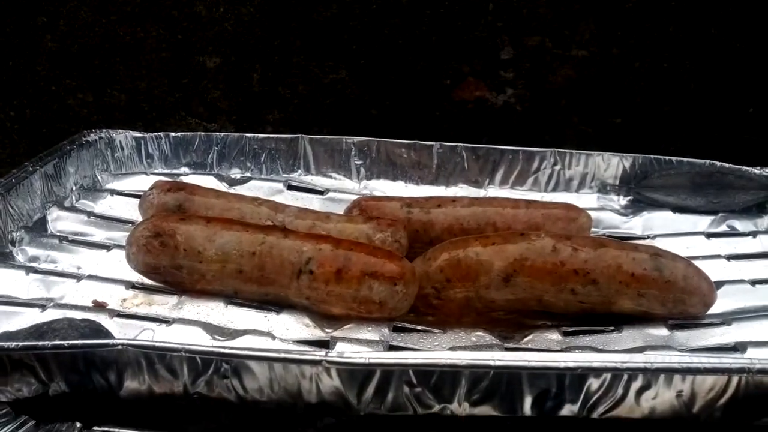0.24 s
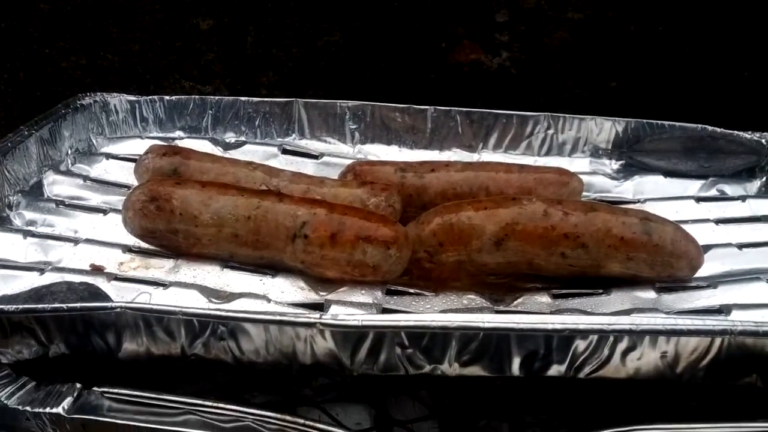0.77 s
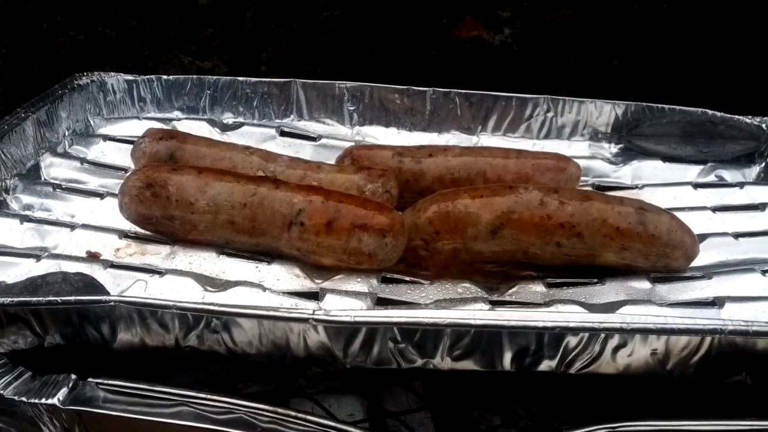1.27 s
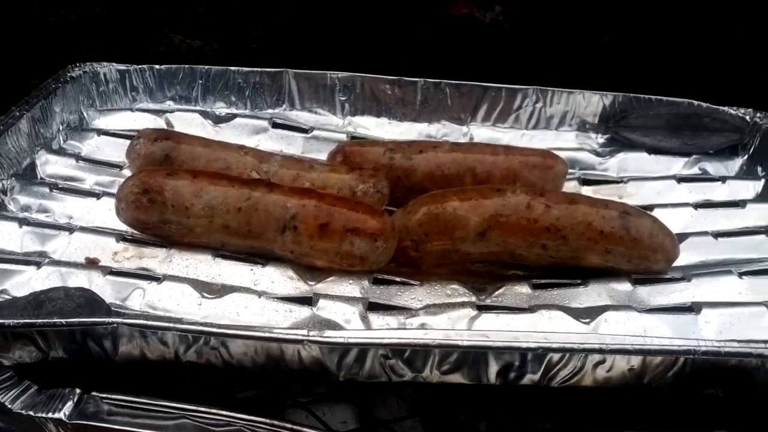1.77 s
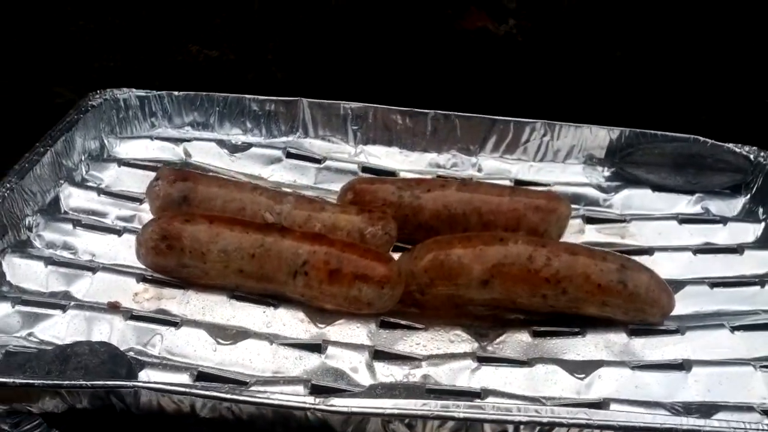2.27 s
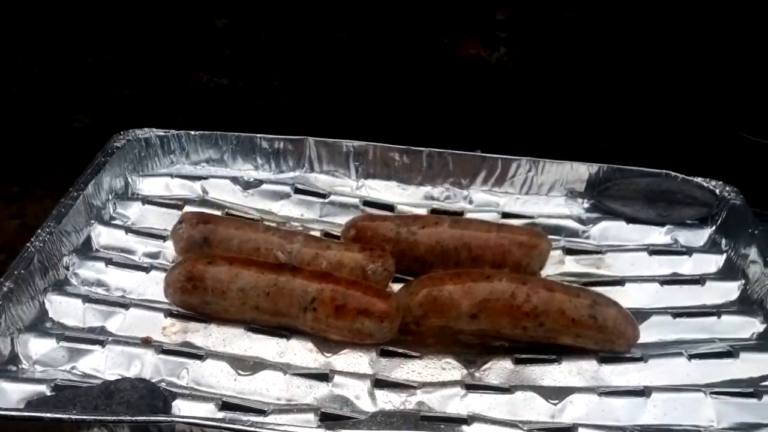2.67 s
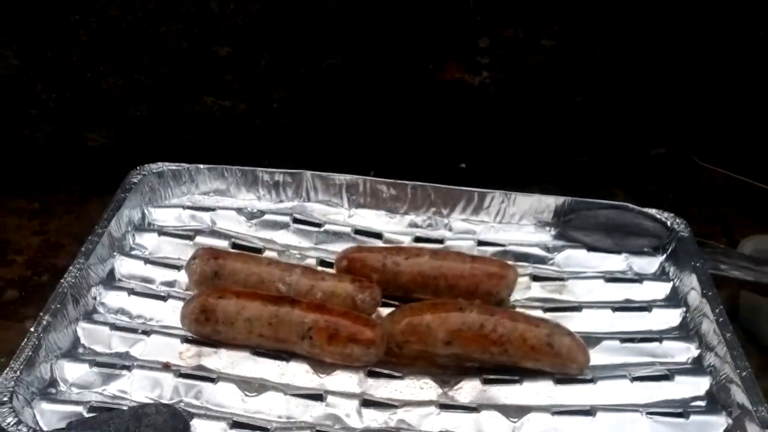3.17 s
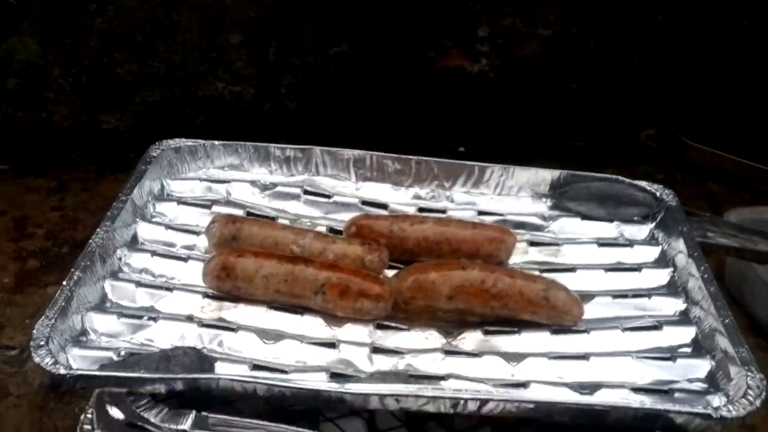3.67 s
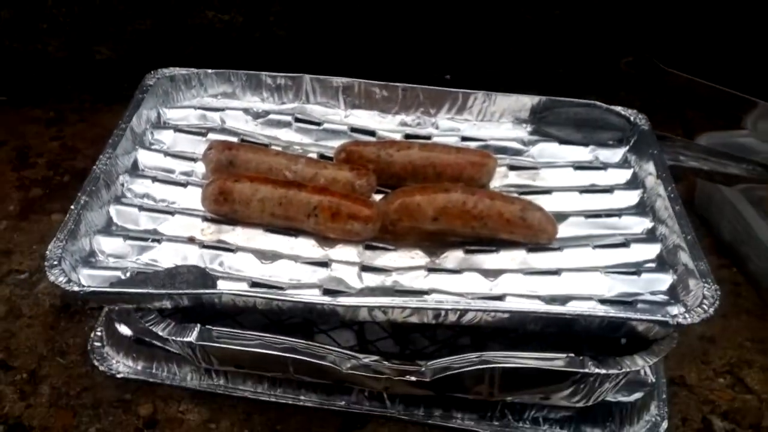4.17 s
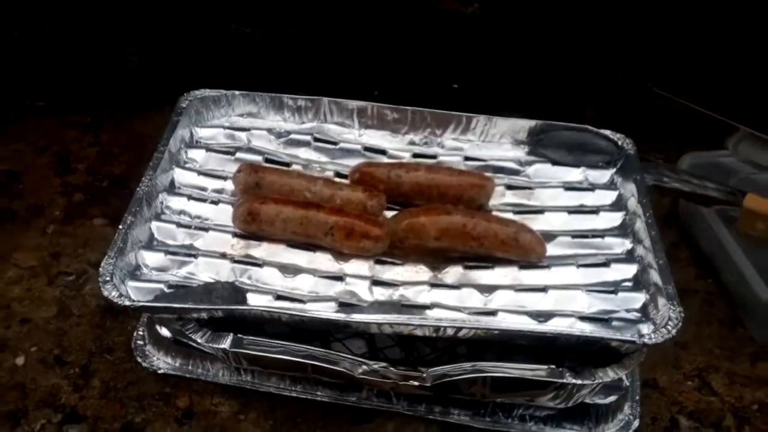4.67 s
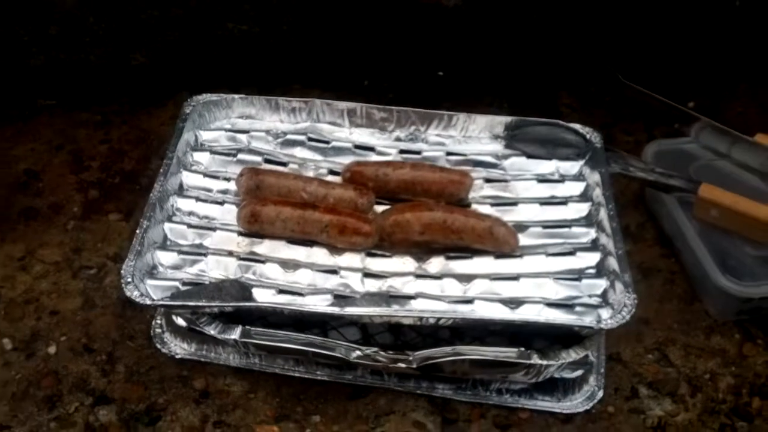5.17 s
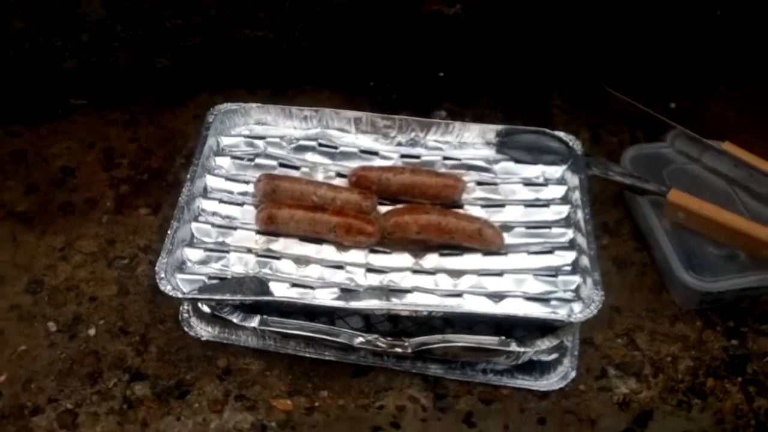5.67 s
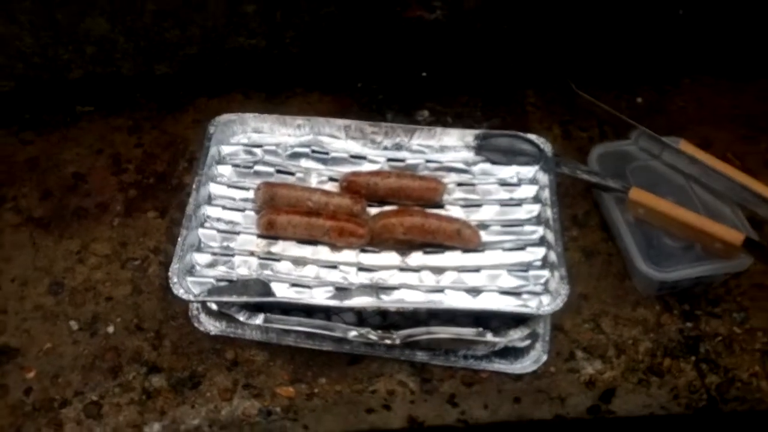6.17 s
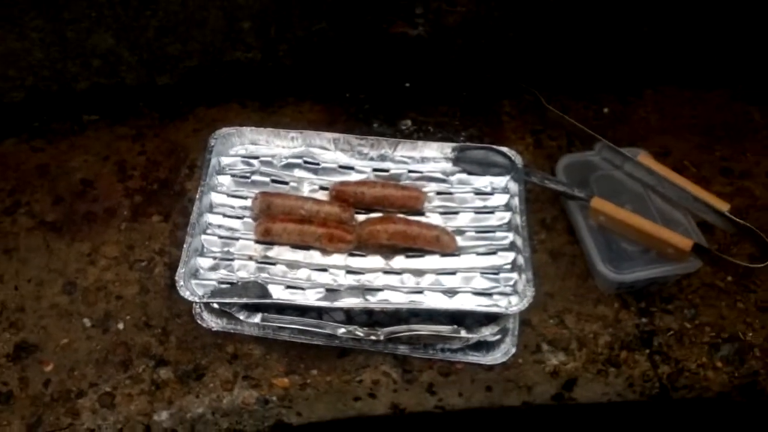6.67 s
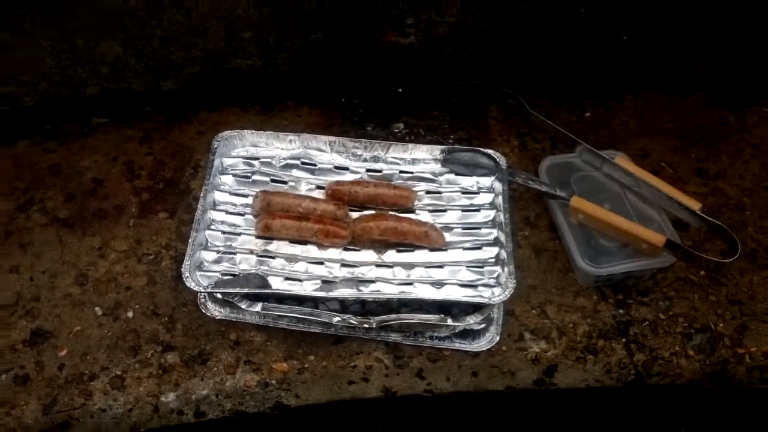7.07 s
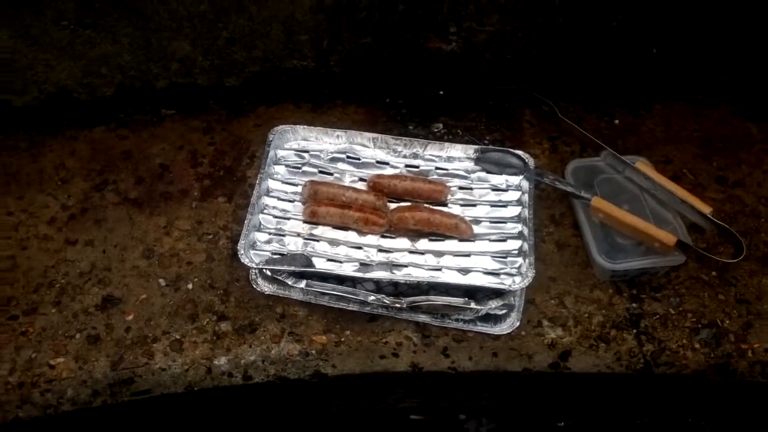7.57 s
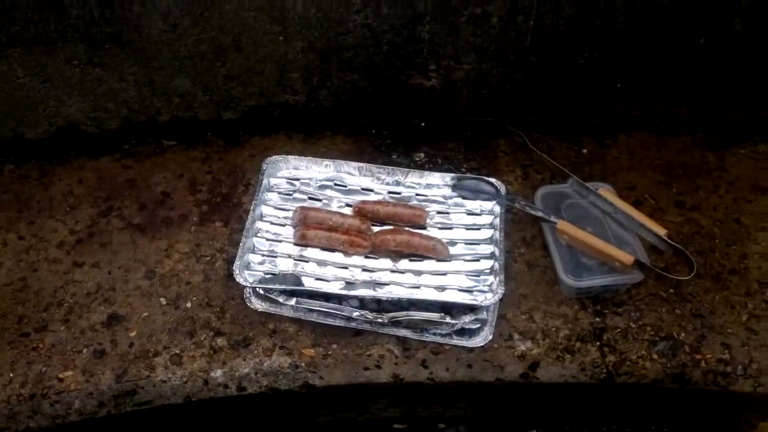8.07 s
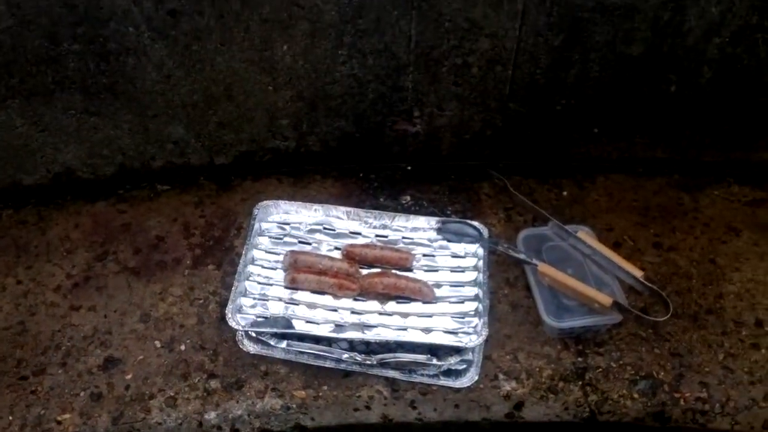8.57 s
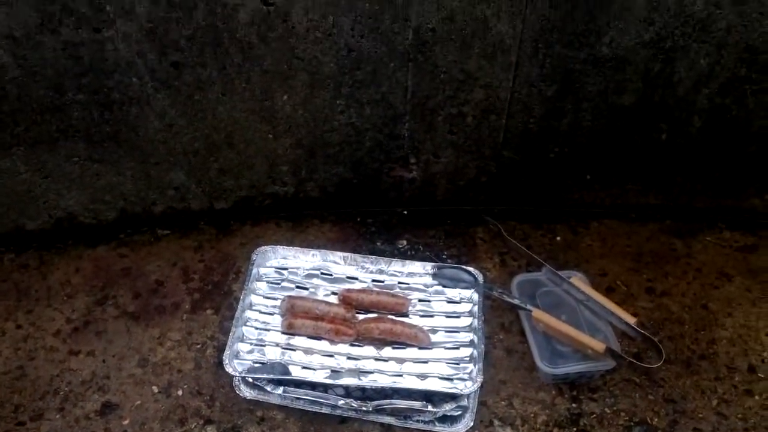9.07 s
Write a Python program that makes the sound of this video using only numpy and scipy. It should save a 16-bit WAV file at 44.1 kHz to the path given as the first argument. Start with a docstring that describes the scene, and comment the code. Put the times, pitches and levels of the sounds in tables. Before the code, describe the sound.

Sausages fry briskly on a thin foil tray outdoors, a bright dense hiss full of sharp crackling spits, bubbling, and faint wind rumble.

```python
"""Outdoors, sausages fry on a foil tray over coals, heard by a small hand-held microphone.
Water boils out into the fat: short noise bursts make a dense fizz, a lower bubbling and louder spits.
Large steam bubbles are damped sine waves with spray; pops and a knock are single pushes of air.
The foil rim answers each burst within milliseconds. Shaped noise makes the breeze on the microphone's
port, a distant drone and one hollow scuff."""
import sys
import numpy as np
from scipy.fft import rfft, irfft, next_fast_len
from scipy.io import wavfile
from scipy.ndimage import uniform_filter1d, map_coordinates

SR = 44100
rng = np.random.default_rng(int(sys.argv[2]) if len(sys.argv) > 2 else 0)


def file_out(sig):
    """Save sig as 16-bit WAV at sys.argv[1]."""
    # one column per channel
    cols = np.atleast_2d(sig).T
    # limit, then scale
    lim = np.clip(cols, -1, 1)
    pcm = np.round(lim * 32767).astype(np.int16)
    wavfile.write(sys.argv[1], SR, pcm)


N = 411453  # length of the scene in samples

# How hard it fries before stirring and chance, fading at the end as the microphone draws back:
# (time [s], fizz level [dB], bubbling level [dB])
FRYING_LEVELS = [(0.0, -24, -33.5), (0.23, -23, -36), (0.6, -25.5, -36.5), (1.09, -28, -36),
                 (1.77, -22.5, -35.5), (2.0, -20.5, -36), (2.81, -23.5, -37.5), (4.39, -21.5, -34),
                 (4.7, -26, -36), (5.19, -22.5, -32.5), (5.48, -22.5, -37.5), (5.82, -19.5, -32.5),
                 (6.37, -25.5, -37), (7.35, -22.5, -36), (7.72, -25, -38), (8.29, -25, -36),
                 (8.81, -30.5, -43), (9.33, -30.5, -43)]
# The sharpest spits of fat: (time [s], peak [dB], favoured pitch [Hz])
BIG_SPITS = [(0.0847, -6, 11500), (0.1282, 2, 11400), (0.1693, -5, 12500), (0.3118, -13.5, 12400),
             (0.3375, 4, 13580), (0.4426, -26, 10600), (0.6407, -3, 11300), (0.7317, -5, 11600),
             (0.7705, -3, 10700), (0.782, 1, 10900), (0.7935, -10, 12400), (0.8037, -6.5, 10900),
             (0.8097, 4.5, 11400), (0.8815, -6, 12300), (1.0944, -12, 11500), (1.2822, -3, 12700),
             (1.339, 1, 8700), (1.3624, -7, 11000), (1.467, 0, 9600), (1.5001, -1, 9730),
             (1.5202, -24, 12800), (1.6734, -7, 13100), (1.6827, 0, 11200), (1.7283, -7, 12100),
             (1.7708, -26, 10800), (1.8408, -3, 9800), (1.8565, -3, 10100), (1.8715, -3, 10200),
             (1.9, -3, 11100), (1.9477, -18, 12800), (1.997, 8, 12000), (2.0389, 0, 8000),
             (2.1079, -6, 10900), (2.132, 1, 8500), (2.1888, -3, 11100), (2.2873, 0, 11400),
             (2.3172, -2, 9800), (2.3463, 2, 12300), (2.4118, -15, 10200), (2.5175, 2, 11600),
             (2.599, -9.5, 9800), (2.6131, 0, 10300), (2.712, 5, 9900), (2.718, -9, 9700),
             (2.7578, -15, 9700), (2.799, 4.5, 8900), (2.8192, -1, 8400), (2.8282, 6.5, 8400),
             (2.9628, 0, 10200), (2.9975, -4, 12100), (3.0561, -2, 11300), (3.187, 0, 11600),
             (3.238, -4, 10100), (3.2449, -4, 7400), (3.285, 0, 11900), (3.3159, -1, 11600),
             (3.3607, 4, 10800), (3.5033, 5, 8000), (3.52, -8.5, 10100), (3.55, -3, 8900),
             (3.5608, 1, 12300), (3.585, -1, 9800), (3.5982, 0, 9300), (3.6863, -1, 8900),
             (3.7664, -26, 12700), (3.7908, -10, 9500), (3.831, -1, 9450), (3.9199, -8, 10300),
             (4.036, -11, 8600), (4.0971, -7, 12100), (4.1047, -5, 10700), (4.1829, 0, 10500),
             (4.243, -3, 9100), (4.3164, 4, 9700), (4.33, -15, 9900), (4.36, -9, 11200), (4.405, 1, 8500),
             (4.441, -6.5, 8700), (4.4939, -1, 10000), (4.5053, -3, 7600), (4.5311, 0, 12900),
             (4.5437, 5, 10900), (4.6385, -1, 11500), (4.6908, -1, 8100), (4.7012, 2, 9700),
             (4.7275, -1, 11200), (4.7916, 4.5, 10500), (4.8278, 0.5, 8400), (4.9068, 4.5, 10400),
             (5.0312, -4, 7700), (5.0583, 1, 11400), (5.0665, 4, 9200), (5.2095, -8, 12700),
             (5.2358, 1.5, 9500), (5.333, -12, 11700), (5.3579, 3, 10600), (5.387, -1, 10700),
             (5.4085, -4, 10400), (5.4225, 4.5, 9080), (5.5282, -14, 12200), (5.6456, -10.5, 11400),
             (5.6748, -26.5, 13200), (5.9652, -14.5, 10400), (6.0308, -24, 11100), (6.119, -3, 11430),
             (6.2805, 1.5, 11900), (6.343, -24.5, 12800), (6.4326, 0.5, 10700), (6.486, -3, 10200),
             (6.692, -2, 10000), (6.7497, 2, 10100), (6.8484, -8, 11300), (6.926, 0, 10700),
             (6.9654, -3, 8000), (7.073, -8, 11000), (7.1151, 0.5, 10000), (7.163, -0.5, 8800),
             (7.203, -5, 11300), (7.2221, -21, 10100), (7.2594, -15.5, 10800), (7.2956, -3, 9500),
             (7.3517, -8, 11200), (7.3634, 3, 9200), (7.3837, -9, 10600), (7.505, -1, 9000),
             (7.541, 1, 13000), (7.5758, 0, 10500), (7.8151, -19, 9300), (7.9727, -5, 13300),
             (8.0472, 3, 11600), (8.057, 2, 10200), (8.0632, -2, 9500), (8.0698, -2, 13000),
             (8.081, 6, 9900), (8.2136, -3, 10100), (8.2603, 0, 9600), (8.3083, -7, 8300),
             (8.6106, 0, 9400), (8.6596, -18.5, 14300), (8.762, -5, 10900), (8.8062, -9.5, 11800),
             (8.8135, -1, 12200), (8.997, 1, 10960), (9.011, -7, 10500), (9.0244, -14, 10500),
             (9.0573, 2.5, 8100), (9.0732, -11, 10900), (9.1096, -3.5, 10500), (9.2211, -1, 11200),
             (9.3015, -13, 11400)]
# The largest steam bubbles: (time [s], reference level [dB], pitch [Hz])
BIG_BUBBLES = [(0.0166, -10, 4600), (0.1017, -7, 4470), (0.4036, -6, 5230), (0.471, -11, 4460),
               (0.4878, -9.5, 5100), (0.5739, -15.5, 2730), (0.6018, -6, 4500), (0.6176, -14, 4950),
               (0.77, -10, 5400), (0.7883, -10.5, 4670), (0.872, -12, 5100), (0.9744, -9.5, 4784),
               (1.0603, -19, 4876), (1.2643, -15, 4270), (1.3395, -17, 4690), (1.3998, -12.5, 4220),
               (1.4997, -25, 4570), (1.536, -4.5, 4500), (1.5573, -13.5, 2750), (1.5831, -12, 4626),
               (1.6155, -10.5, 4700), (1.6688, -15, 2815), (1.6829, -13, 2600), (1.7376, -16, 4910),
               (2.0054, -13, 2620), (2.0115, -10.5, 5340), (2.0393, -20, 5210), (2.093, -17, 4828),
               (2.132, -17, 6370), (2.188, -12.5, 3500), (2.2157, -10, 4720), (2.2762, -18, 3270),
               (2.2875, -17, 4660), (2.428, -16, 5130), (2.508, -15, 4592), (2.5249, -8.5, 4530),
               (2.5985, -16, 4480), (2.613, -11, 4500), (2.6698, -12, 2430), (2.683, -6.5, 4770),
               (2.757, -13, 5250), (2.798, -14, 2800), (2.8, -11, 2170), (2.8058, -12, 5240),
               (3.0098, -14, 5470), (3.151, -10, 5500), (3.1865, -21, 4010), (3.3246, -14.5, 3510),
               (3.446, -6, 4770), (3.4568, -7, 4110), (3.4751, -6, 3510), (3.5995, -19, 3790),
               (3.6232, -23, 5170), (3.6856, -11.5, 4700), (3.791, -12, 2800), (3.8309, -8, 4540),
               (3.8762, -11, 3730), (3.967, -11, 3120), (4.087, -12.5, 4650), (4.1634, -11.5, 3600),
               (4.192, -10.5, 4630), (4.2788, -15, 2900), (4.3067, -6.5, 5200), (4.3753, -8, 4310),
               (4.394, -11, 4060), (4.511, -9.5, 4010), (4.5435, -14, 3100), (4.6478, -15, 4935),
               (4.6903, -11.5, 4480), (4.945, -15, 3326), (5.012, -20, 4432), (5.0315, -8, 3240),
               (5.0789, -10.5, 4130), (5.2006, -9, 4440), (5.2729, -9, 4040), (5.3841, -12, 3050),
               (5.471, -18, 3750), (5.7447, -12.5, 2780), (5.8023, -15, 6404), (5.8418, -18, 3940),
               (6.233, -16, 4400), (6.3179, -4, 4300), (6.3296, -28, 4720), (6.5383, -13.5, 3100),
               (6.5668, -17.5, 3170), (6.7274, -17, 3100), (6.8405, -19, 4840), (6.965, -12.5, 3060),
               (7.0295, -14, 4520), (7.164, -20, 5060), (7.2676, -17, 4950), (7.294, -10.5, 4420),
               (7.339, -11, 4044), (7.659, -17, 3460), (7.674, -13.5, 4009), (7.8679, -20.5, 2140),
               (7.932, -16.5, 3130), (7.9461, -18, 3445), (7.9746, -15, 6240), (8.046, -20, 5510),
               (8.0556, -12, 4505), (8.0556, -18, 1810), (8.081, -24, 3320), (8.113, -25, 4650),
               (8.1226, -11, 5100), (8.2136, -18, 6480), (8.2258, -10.5, 4430), (8.2599, -11, 3960),
               (8.2615, -13, 2220), (8.3932, -17.5, 4520), (8.6105, -18, 6310), (8.7769, -20, 5664),
               (8.946, -17, 4670), (8.9978, -17.5, 3000), (9.1086, -15.5, 6550), (9.2113, -20.5, 2940),
               (9.233, -11, 5358)]
# Spits and bubbles added at random times:
# (count, smallest peak above the fizz or bubbling [dB], average extra before the cap [dB], most extra [dB])
RANDOM_SPITS = (240, 17.8, 1.142, 12)
RANDOM_BUBBLES = (70, 15.709, 1.15, 2.6)
# Short pushes of air: (time [s], peak [dB])
AIR_POPS = [(0.4426, -19), (1.4996, -19), (1.682, -20), (1.8423, -17), (1.864, -16.5), (1.9007, -14),
            (2.108, -13), (2.3173, -14), (2.6156, -15), (2.6712, -24), (2.7181, -17), (2.7993, -12),
            (2.9317, -14), (2.969, -16.5), (3.1753, -17), (3.285, -14.5), (3.4623, -7.5), (4.3944, -15),
            (4.5437, -26), (4.5572, -15), (4.7056, -15), (4.7611, -15), (4.8278, -12), (5.0146, -14),
            (5.4226, -10), (5.5004, -17), (5.7875, -16.5), (5.8023, -13.5), (7.1215, -17), (7.9734, -10),
            (8.0449, -20)]
# One soft knock near the microphone: (start [s], peak [dB], pitch [Hz])
KNOCK = [(0.843, -19, 285)]
# Steady buffeting by the breeze: (time [s], level [dB])
BREEZE_LEVELS = [(0.0, -39), (0.21, -47), (0.91, -49), (1.04, -43.5), (2.96, -47.5), (4.31, -45),
                 (4.49, -47), (7.95, -55), (8.58, -43.5), (9.33, -47.5)]
# Separate puffs on the port, timed at half height: (start [s], length [s], level [dB])
BREEZE_PUFFS = [(0.016, 0.15, -37.5), (0.162, 0.058, -38), (0.358, 0.046, -30.5), (0.437, 0.08405, -31),
                (0.541, 0.059, -37), (0.666, 0.042, -39), (0.71, 0.037, -39), (0.76, 0.062, -34),
                (0.836, 0.05826, -40), (0.924, 0.092, -34.5), (1.024, 0.044, -35), (1.347, 0.055, -38),
                (1.437, 0.082, -38), (1.844, 0.052, -33), (2.019, 0.052, -29.5), (2.116, 0.04, -31.5),
                (2.41, 0.03, -44), (2.738, 0.04, -32.5), (2.977, 0.048, -40), (3.528, 0.034, -34.5),
                (3.597, 0.02883, -37), (3.758, 0.055, -38), (4.222, 0.032, -43), (4.298, 0.03412, -37),
                (8.487, 0.036, -35.5), (8.64, 0.036, -35), (9.07, 0.03, -35)]
# A soft hollow scuff: (start [s], rise time [s], fall time [s], level before its swell [dB])
SCUFF = (6.965, .008, .07, -41)
# The tray's rim answers each burst: (delay [s], scatter of delay [s], average level [dB])
RIM_ECHO = (.002, .0003, -7)

# Colours: how strongly each frequency is let through, (frequency [Hz], gain [dB])
FIZZ_COLOUR = [(2940, -17.5), (5000, -7.5), (6000, -13.5), (6990, -8), (8390, -7), (11600, 1.5),
               (13900, 3.5), (15100, 5.5), (15700, -1)]  # a small burst, with the microphone's treble peak
FROTH_COLOUR = [(590, -27.5), (1000, -5.5), (1530, -9.5), (1860, -5), (2320, -8), (2940, -4), (4480, -4),
                (6000, -5.5), (7800, -2), (13200, -120)]  # the bubbling
BUFFET_COLOUR = [(12, -62), (20, 0.5), (66, -2), (97, -8.5), (135, -11), (200, -32), (260, -57.5),
                 (440, -120)]  # wind on the port
DRONE_COLOUR = [(35, -41), (60, 2), (226, -3.5), (314, -5), (695, -5.5), (800, -7.5), (1380, -14),
                (1540, -23.5), (1890, -13.5), (2500, -7), (3250, -40), (5500, -120)]  # distant outdoor noise
SCUFF_COLOUR = [(250, -22), (480, -5), (570, 4), (720, -16), (900, -1), (1150, -11), (2000, -38)]  # the hollow scuff
# Treble roll-off, the sound darkens steeply above about 15.8 kHz: (frequency [Hz], gain [dB])
TREBLE_ROLL_OFF = [(15750, 0), (16050, -30), (16700, -40)]
TOP_HZ = 16950  # nothing passes from here up

DRONE_DB = -47.5
GUST_EDGE_S = 0.032  # time for a full rise or fall of a puff
CRACK_DB = 8.5  # the wall tears in one instant: first spike over the snap noise
DROPLET_S, DROPLET_DB = .001, 3.5  # spray lands as droplets: their length and scatter of size
SPRAY_DB, RING_DB = -1, -4  # a bubble's spray and ring against its reference level
STIR_S, CALM_DB = 0.013, -1  # how fast stirred fat settles, and the floor added under the stirring
STIR_SHARE = 0.47  # how far the fizz and bubbling follow the stirring


def amp(db):
    """Turn a level in dB into a gain."""
    return 10 ** (np.asarray(db) / 20)


def unit(x):
    """Scale a sound to an average (rms) strength of 1."""
    return x / np.sqrt(np.mean(x ** 2) + 1e-20)


def curves(rows):
    """Join table points with straight lines: one curve for each column after the time."""
    seconds, *columns = np.transpose(rows)
    return [np.interp(np.arange(N) / SR, seconds, column) for column in columns]


def wobble(rate):
    """Draw a smooth random curve through `rate` random points a second."""
    points = rng.standard_normal(int(N * rate / SR) + 4)
    return map_coordinates(points, [np.arange(N) * rate / SR])


def coloured(x, colour):
    """Filter a sound to a colour without any sound before its cause."""
    m = 2 * next_fast_len(N // 2 + SR // 4)
    f, db = np.transpose(colour)
    bins_hz = np.fft.rfftfreq(m, 1 / SR)
    gain = amp(np.interp(np.log(bins_hz + 1), np.log(f + 1), db))
    # Folding the cepstrum gives the filter that responds as early as it can
    cepstrum = irfft(np.log(gain + 1e-6), m)
    cepstrum[1:m // 2] *= 2
    cepstrum[m // 2 + 1:] = 0
    return irfft(rfft(x, m) * np.exp(rfft(cepstrum)), m)[:N]


def place(seconds, shapes):
    """Add up short sounds, one per row, at their times."""
    starts = np.round(np.asarray(seconds) * SR).astype(int)[:, None]
    at = starts + np.arange(shapes.shape[1])
    return np.bincount(at.ravel(), shapes.ravel(), N + SR)[:N]


def scatter(count, spread_db, cap_db):
    """Draw random times, and sizes in dB with a tail of large ones."""
    draw = rng.random((count, 2))
    sizes_db = -spread_db * np.log(draw[:, 1] + 1e-9)
    return draw[:, 0] * N / SR, np.minimum(sizes_db, cap_db)


def pitches(count, hz, spread):
    """Draw pitches around a middle one, since bubbles come in many sizes."""
    return hz * np.exp(spread * rng.standard_normal(count))


def among(rule, level_db):
    """Draw random events whose size follows the level of the frying."""
    count, over_db, spread_db, cap_db = rule
    s, extra_db = scatter(int(count), spread_db, cap_db)
    return s, extra_db + over_db + level_db[(s * SR).astype(int)]


def bursts(db, hz, colour, sharp, snap_t60, spray_t60, spray_db, size):
    """Noise snaps, is answered by the rim and trails off in droplets; a hollow favours each pitch.

    The t60 settings are the seconds a part takes to fall by 60 dB; size is in samples.
    """
    count = len(db)
    t = np.arange(size) / SR
    snap = amp(-60 * t / snap_t60)

    delay_s, scatter_s, echo_db = RIM_ECHO
    late = t - np.abs(delay_s + scatter_s * rng.standard_normal((count, 1)))
    each_echo_db = rng.normal(echo_db, 3, (count, 1))
    echo = (late > 0) * amp(each_echo_db - 60 * np.abs(late) / snap_t60)

    droplet_sizes = DROPLET_DB * rng.standard_normal((count, 200))
    droplets = droplet_sizes[:, (t / DROPLET_S).astype(int)]
    spray = amp(spray_db + droplets - 60 * t / spray_t60)

    noise = rng.standard_normal((count, size))
    noise[:, 0] = amp(CRACK_DB)
    f = np.fft.rfftfreq(size, 1 / SR) / hz[:, None]
    cavity = 1j * f / sharp / (1 - f * f + 1j * f / sharp)  # the bubble's hollow resonates
    click = np.arange(N) == 0
    tint = rfft(coloured(click, colour)[:size])
    rows = irfft(rfft((snap + echo + spray) * noise) * cavity * tint, size)
    return amp(db)[:, None] * rows / np.abs(rows).max(axis=1, keepdims=True)


def rings(db, hz, cycles, waver, size):
    """Bubbles ring as fading sine waves whose pitch wavers as the wall tears."""
    t = np.arange(size) / SR
    drift = np.cumsum(waver * rng.standard_normal((len(db), size)), axis=1)
    decay = np.exp(-t * hz[:, None] / cycles)
    return amp(db)[:, None] * decay * np.sin(2 * np.pi * hz[:, None] * t + drift)


def frying():
    """Set fizz and bubbling levels: big spits and bubbles stir the fat, which settles into a lull."""
    s, db = np.transpose([row[:2] for row in BIG_SPITS + BIG_BUBBLES])
    settle = np.exp(-np.arange(SR // 4) / SR / STIR_S)
    stir = amp(CALM_DB) + place(s, amp(db)[:, None] * settle)
    stir_db = 20 * np.log10(stir)
    # Compare a short average with a half-second one, so stirring and lulls balance out
    stir_db = uniform_filter1d(stir_db, size=100) - uniform_filter1d(stir_db, size=SR // 2)
    chance_db = 1.0054 * wobble(rate=24) + 1.8 * wobble(rate=5)
    return np.array(curves(FRYING_LEVELS)) + STIR_SHARE * stir_db + chance_db


def fizz(level_db):
    """Thousands of tiny bursts crackle over a thin hiss of steam."""
    s, db = scatter(count=6000, spread_db=5.0, cap_db=11)
    hz = pitches(len(s), 11080, 0.28308)
    grains = bursts(db, hz, FIZZ_COLOUR, sharp=3.4, snap_t60=0.0013, spray_t60=0.029,
                    spray_db=-15.5, size=500)
    steam = amp(-7) * unit(coloured(rng.standard_normal(N), FIZZ_COLOUR))
    return amp(level_db) * unit(unit(place(s, grains)) + steam)


def froth(level_db):
    """Small bubbles tear open in a patter, each favouring its own pitch, with a ragged level."""
    s, db = scatter(count=2200, spread_db=6.0, cap_db=12)
    hz = pitches(len(s), 4140, 0.34228)
    grains = bursts(db, hz, FROTH_COLOUR, sharp=2.7, snap_t60=0.0028, spray_t60=0.075,
                    spray_db=-13.5, size=500)
    steam = amp(-7) * unit(coloured(rng.standard_normal(N), FROTH_COLOUR))
    ragged_db = level_db + 1.3 * wobble(rate=100)
    return amp(ragged_db) * unit(unit(place(s, grains)) + steam)


def breeze():
    """Wind on the port makes lumpy low noise, with steady buffeting and separate puffs."""
    t = np.arange(N) / SR
    puffs = np.zeros(N)
    for start, length, db in BREEZE_PUFFS:
        inside = np.minimum(t - start, start + length - t)
        puffs += amp(db) * np.clip(inside / GUST_EDGE_S + .5, 0, 1)
    lumps = amp(2.65 * wobble(rate=16))
    noise = unit(lumps * coloured(rng.standard_normal(N), BUFFET_COLOUR))
    return np.hypot(amp(curves(BREEZE_LEVELS)[0]), puffs) * noise


def drone():
    """Distant outdoor sound is steady noise of a fixed colour."""
    return amp(DRONE_DB) * unit(coloured(rng.standard_normal(N), DRONE_COLOUR))


def bubbles(level_db):
    """Each large bubble rings raggedly at its pitch, sprays around it and throws a fine mist."""
    s, db = among(RANDOM_BUBBLES, level_db)
    random_ones = [s, db, pitches(len(s), 4860, 0.13)]
    s, db, hz = np.hstack([np.transpose(BIG_BUBBLES), random_ones])
    ring = rings(db + RING_DB, hz, cycles=3.5, waver=0.031, size=900)
    spray = bursts(db + SPRAY_DB, hz, FROTH_COLOUR, sharp=2.63, snap_t60=0.0023, spray_t60=0.084,
                   spray_db=-7, size=2200)
    mist = bursts(db, pitches(len(s), 7100, .2), FIZZ_COLOUR, sharp=1.4, snap_t60=0.0049,
                  spray_t60=0.055, spray_db=-1, size=2200)
    return place(s, ring) + place(s, spray + mist)


def spits(level_db):
    """Fat spits in loud bursts, in the colour of the fizz."""
    s, db = among(RANDOM_SPITS, level_db)
    random_ones = [s, db, pitches(len(s), 11700, 0.48)]
    s, db, hz = np.hstack([np.transpose(BIG_SPITS), random_ones])
    shapes = bursts(db, hz, FIZZ_COLOUR, sharp=0.97, snap_t60=0.0018, spray_t60=0.033,
                    spray_db=-11, size=1400)
    return place(s, shapes)


def pops():
    """A burst pushes air once, as a smooth bump, and does not ring."""
    s, db = np.transpose(AIR_POPS)
    t = np.arange(-40, 41) / SR
    push = np.exp(-(t / 0.000074) ** 2)
    return place(np.abs(s + t[0]), amp(db)[:, None] * push)  # centred on the listed time


def knock():
    """A soft knock moves the air in one slow swing that dies away at once."""
    s, db, hz = np.transpose(KNOCK)
    t = np.arange(400) / SR - .004  # the peak comes 4 ms after the start
    swing = -np.cos(2 * np.pi * hz[:, None] * t) * np.exp(-(t / 0.0017) ** 2)
    return place(s, amp(db)[:, None] * swing)


def scuff():
    """A short scuff is dull, hollow noise that swells and fades."""
    start, rise_s, fall_s, db = SCUFF
    t = np.maximum(np.arange(N) / SR - start, 0)
    swell = (1 - np.exp(-t / rise_s)) * np.exp(-t / fall_s)
    return amp(db) * swell * unit(coloured(rng.standard_normal(N), SCUFF_COLOUR))


def scene():
    """Add up the frying, the small movements and the open air."""
    fizz_db, bubbling_db = frying()
    tray = fizz(fizz_db) + froth(bubbling_db)
    air = breeze() + drone()
    tray = tray + bubbles(bubbling_db) + spits(fizz_db) + pops()
    return (tray + air + knock() + scuff())[None]


def record(dry):
    """The microphone softly clips the loudest peaks; the highest treble is then rolled off and cut."""
    clipped = dry / (1 + np.abs(dry / .7) ** 6) ** (1 / 6)
    m = next_fast_len(N + SR // 4)
    hz = np.fft.rfftfreq(m, 1 / SR)
    treble = amp(np.interp(hz, *np.transpose(TREBLE_ROLL_OFF))) * (hz < TOP_HZ)
    return irfft(rfft(clipped, m) * treble, m)[..., :N]


dry = scene()
out = record(dry)
file_out(out)
```